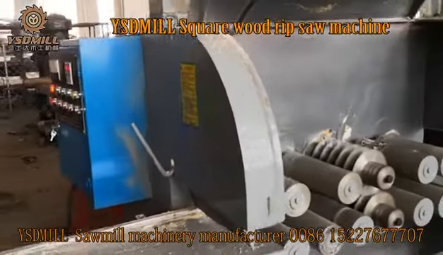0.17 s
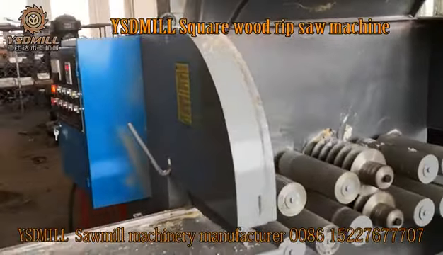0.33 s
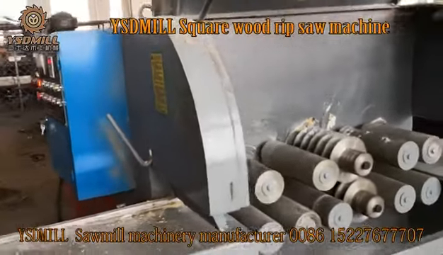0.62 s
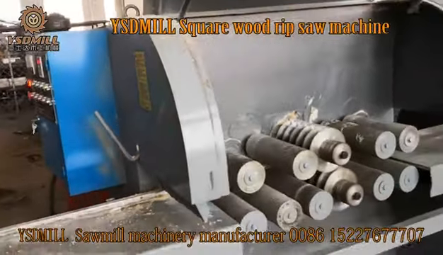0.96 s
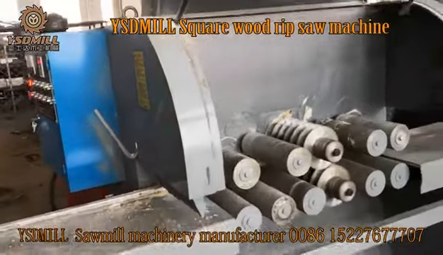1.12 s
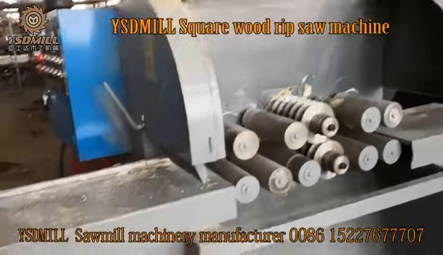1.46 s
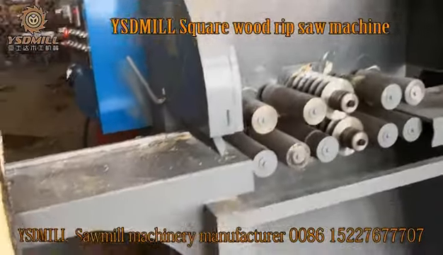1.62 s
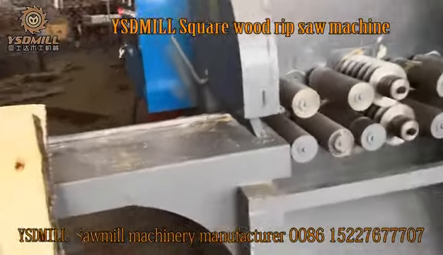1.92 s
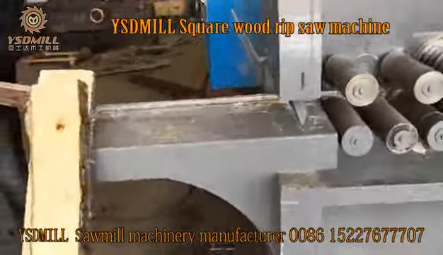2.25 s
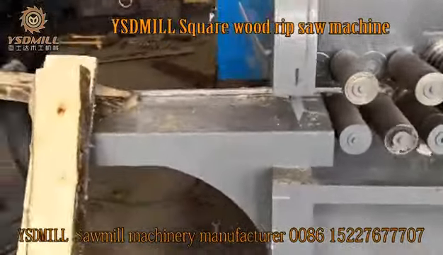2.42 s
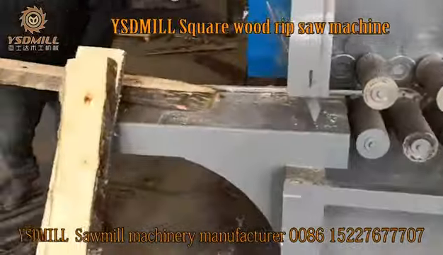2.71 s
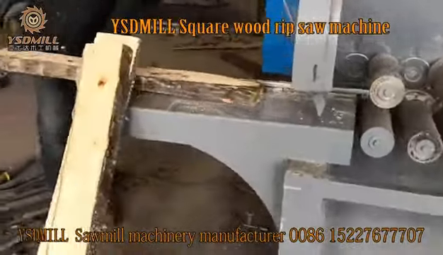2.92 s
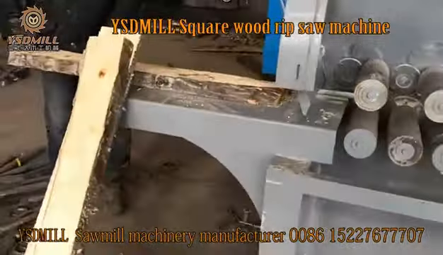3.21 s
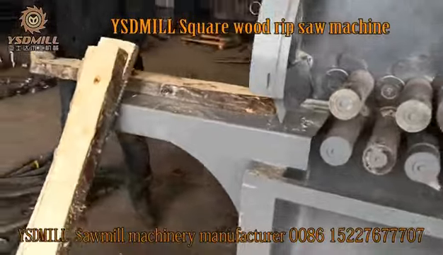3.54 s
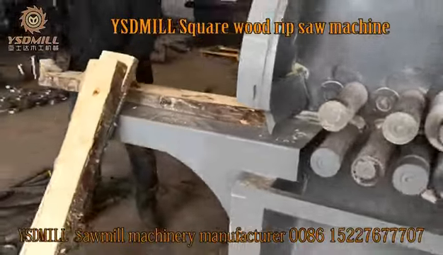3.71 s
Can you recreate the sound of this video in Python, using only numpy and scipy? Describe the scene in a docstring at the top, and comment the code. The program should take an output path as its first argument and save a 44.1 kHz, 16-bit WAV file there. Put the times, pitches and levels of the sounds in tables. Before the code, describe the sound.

Loud steady saw drone throughout, with hissing air stronger on the right and a fuzzy high squeal swelling and fading; one rapid double metallic clink on the left before the middle, in a noisy workshop hall.

```python
"""Idling multi-blade rip saw

In a workshop a saw idles past a moving pair of microphone ports. Shaped noise makes the hall wash, the
cabinet rumble and the rush of air through the blades on the right. Sines blurred by slow noise make the
wavering motor and gear whines and a fuzzy squeal with its octave. A steel tool, a set of decaying sines,
clinks twice, mostly on the left.
"""
import sys
import numpy as np
from scipy import signal
from scipy.io import wavfile
from scipy.ndimage import uniform_filter1d

SR = 44100
rng = np.random.default_rng(int(sys.argv[2]) if len(sys.argv) > 2 else 0)


def unload_audio(sound):
    """Save the sound as a 16-bit wav file, at the path given as the first command line argument."""
    columns = np.transpose(np.atleast_2d(sound))
    # keep every value between -1 and 1, then stretch to whole-number steps
    steps = np.round(np.clip(columns, -1, 1) * 32767)
    wavfile.write(sys.argv[1], SR, steps.astype(np.int16))


def voltage_ratio(decibels):
    """Convert decibels (scalar or array-like) to amplitude ratios, 20 dB per decade."""
    exponent = np.asarray(decibels, float) / 20
    return 10 ** exponent


N = 170667  # length [samples]


def evened(x):
    """Scales a signal to rms 1."""
    return x / np.sqrt(np.mean(np.abs(x) ** 2) + 1e-20)


def read(points, hz):
    """Reads a (frequency, value) table at hz, interpolating along log frequency."""
    f, value = np.transpose(points)
    return np.interp(np.log(hz + 1), np.log(f + 1), value)


def columns(table, t):
    """Reads every column of a curve table at times t; the first column is time."""
    rows = np.transpose(table)
    return [np.interp(t, rows[0], col) for col in rows[1:]]


def panned(pan_db):
    """Left and right gains whose levels differ by pan_db."""
    return voltage_ratio(np.array([[.5], [-.5]]) * pan_db)


def rfft_hz(size):
    """Bin frequencies of a short-time spectrum."""
    return np.arange(size // 2 + 1) * SR / size


def noise(field_db, patchy_db, flicker_db, channels=1, size=1024):
    """Random short-time spectra under field_db(hz, t), with patches and a flicker shared by all bins."""
    hop = size // 4
    frames, hz = N // hop + 5, rfft_hz(size)
    draws = rng.standard_normal((frames, len(hz), channels, 3))
    real, imag, patches = np.moveaxis(draws, (0, 1, 2, 3), (3, 2, 1, 0))
    patches = uniform_filter1d(patches, size=4, axis=1)  # across bins
    patches = evened(uniform_filter1d(patches, size=9, axis=2))  # across frames
    flicker = evened(uniform_filter1d(rng.standard_normal(frames), size=3))
    field = field_db(hz[:, None], np.arange(frames) * hop / SR)
    field = field + patchy_db * patches + flicker_db * flicker
    return (real + 1j * imag) * voltage_ratio(field)


def sound(spectra):
    """Turns short-time spectra into samples of rms 1."""
    size = 2 * (spectra.shape[-2] - 1)
    return evened(signal.istft(spectra, nperseg=size, noverlap=size * 3 // 4)[1][..., :N])


def tone(hz, width_hz, steady, lag, alike=.7):
    """A sine with a fuzzy skirt of slow noise, partly different at the two ports; rms about 1."""
    pole = np.exp(-np.pi * width_hz / SR)
    skirt = rng.standard_normal((N + SR, 2, 2)) @ np.array([1, 1j])
    skirt = signal.lfilter([1], [1, -2 * pole, pole * pole], skirt.T)
    skirt = evened(skirt[:, SR:])  # without the filter's run-in
    alike, steady = np.clip(alike, 0, 1), np.clip(steady, 0, 1)
    skirt[1] = alike * skirt[0] + np.sqrt(1 - alike ** 2) * skirt[1]
    phase = 2 * np.pi * (np.cumsum(hz * np.ones(N)) / SR + rng.random())
    carrier = np.exp(1j * (phase + np.array([[0], [lag]])))
    return np.sqrt(2) * (carrier * (np.sqrt(steady) + np.sqrt(1 - steady) * skirt)).real


def hall():
    """Diffuse wash of the hall: noise unrelated at the two ports, with a hollow under the squeal."""
    # relative spectrum of the wash (frequency [Hz], density [dB per Hz])
    wash_spectrum = [(150, -70.5), (270, -25), (390, -9), (550, -9.5), (1000, -8.5), (1300, -1),
                     (1520, -5.5), (1900, 0.5), (2600, 1), (3100, 4.5), (3330, -1), (3500, -16.5),
                     (3700, -7.5), (3870, -8.5), (4300, -13.5), (5500, -9.5), (6300, -12), (6800, -8),
                     (7050, -9), (7300, -7), (7600, -10)]
    # stereo balance of the wash (frequency [Hz], left minus right [dB])
    wash_pan = [(400, 1), (800, -2.5), (1500, 3.5), (3500, 0.5), (4500, 5), (6000, -0.5), (7100, 6.5),
                (7600, 2.5)]
    # relative motion of the wash (time [s], lows [dB], highs [dB], left minus right [dB], hollow [dB])
    wash_motion = [(0, 2, -3, -2.5, 0), (.7, 2, -2.5, -2, -2), (1.5, 1, -1.5, 2, -3.5),
                   (2.1, 1.5, -1.5, -0.5, -3), (2.6, 0.5, -3.5, -0.5, -8), (3.2, 2, -1.5, -0.5, -10.5),
                   (3.87, 1, -2, 0.5, -9.5)]
    level_db, hollow_hz, hollow_width_hz = -22.5, 2980, 215

    def field(hz, s):
        low, high, pan, hollow = columns(wash_motion, s)
        share = np.clip((hz - 3500) / 1000, 0, 1)  # lows hand over to highs from 3.5 to 4.5 kHz
        side = np.array([.5, -.5])[:, None, None] * (read(wash_pan, hz) + pan)
        dip = hollow * np.exp(-((hz - hollow_hz) / hollow_width_hz) ** 2)
        return read(wash_spectrum, hz) + (1 - share) * low + share * high + side + dip

    return voltage_ratio(level_db) * sound(noise(field, patchy_db=2.5, flicker_db=1.34, channels=2))


def cabinet(t):
    """Rumble of the cabinet, hums of the motor and the swelling boom of a panel, alike in both ports."""
    # relative spectrum of the rumble (frequency [Hz], density [dB per Hz])
    rumble_spectrum = [(12, -60), (20, -30), (38, -16.5), (81, -1), (136, -2.5), (166, -3.5), (194, -3),
                       (247, -4.5), (301, -10), (349, -8.5), (378, -21), (480, -26), (620, -60),
                       (1060, -120)]
    # hums of the motor (frequency [Hz], level [dB], width [Hz], steady share [0-1])
    motor_hums = [(90.1, -39, 21, 0), (197.3, -39.5, 15, 0.1), (251, -39, 7.6, 0)]
    # boom of a panel (time [s], frequency [Hz], level [dB])
    panel_boom = [(0, 128.2, -26.5), (.2, 131.1, -36), (.45, 127.5, -32.5), (1.1, 134.8, -40.5),
                  (1.6, 132.1, -42), (2.3, 131.2, -40), (2.47, 132, -26.5), (2.72, 127.6, -19.5),
                  (2.82, 132.7, -38.5), (3.05, 131.6, -24.5), (3.35, 130.5, -30), (3.5, 134, -27.5),
                  (3.87, 133, -33)]
    rumble_db, boom_width_hz = -27.5, 9.3

    def field(hz, s):
        return read(rumble_spectrum, hz) + 0 * s

    rumble = voltage_ratio(rumble_db) * sound(noise(field, patchy_db=1.5, flicker_db=1.26, size=4096))
    hums = sum(voltage_ratio(db) * tone(hz, width_hz, steady, 0)[0] for hz, db, width_hz, steady in motor_hums)
    boom_hz, boom_db = columns(panel_boom, t)
    boom = voltage_ratio(boom_db) * tone(boom_hz, boom_width_hz, 0.39, 0)[0]
    return rumble + hums + boom


def tool(t):
    """Each blow rings the same steel modes, struck at another spot; then the tool comes to rest."""
    # blows (time [s], level [dB])
    blows = [(1.5122, -9.5), (1.552, -17.5)]
    # modes of the steel, blow levels relative to the blow's own
    # (frequency [Hz], first blow [dB], second blow [dB], 60 dB decay [s], left minus right [dB])
    steel_modes = [(1194, -18.5, -20, 0.18, -5), (1836, -11, -8, 0.12, 5), (1920, -8, 1, 0.12, -2.5),
                   (2526, -17, 1, 0.12, -5.5), (2686, 0.5, -4.5, 0.11, 3), (3597, -6.5, -19.5, 0.13, 6),
                   (4670, -20.5, -10, 0.093, 8), (5200, -19, -41, 0.071, 12), (5630, -14.5, -19, 0.2, 9),
                   (5886, 2, -8, 0.3, 23), (5973, -6, 2.5, 0.38, 24), (6190, -35, -13.5, .12, 13),
                   (7200, -41, -3, .45, 18.5)]
    rise_s, damped_s, damped_t60_s = 0.0033, 1.655, .1
    out = np.zeros((2, N))
    for blow, (start, db) in enumerate(blows):
        since = np.maximum(t - start, 0)
        rise = 1 - np.exp(-since / rise_s)
        for mode, (hz, *spot_db, t60, pan) in enumerate(steel_modes):
            decay = voltage_ratio(db + spot_db[blow] - 60 * since / t60)
            ring = rise * decay * np.sin(2 * np.pi * hz * since)
            polarity = (-1) ** mode
            out += polarity * voltage_ratio(np.array([[0], [-pan]])) * ring  # pan acts on the right alone
    rest = voltage_ratio(-60 * np.maximum(t - damped_s, 0) / damped_t60_s)  # added damping
    return out * rest


def squeal(t):
    """A fuzzy whistle and its octave: drifting sines blurred by wide skirts of noise."""
    # whistle (time [s], pitch [Hz], level [dB], left minus right [dB], octave level [dB])
    whistle_curve = [(0, 3540, -38, -14.5, -49), (0.35, 3490, -28, -10.5, -37.5),
                     (0.83, 3503, -37, -5, -49.5), (1.6, 3545, -30.5, -2, -42.5),
                     (1.71, 3525, -26, -6, -41), (1.8, 3540, -48, -5, -59), (2.25, 3529, -31.5, -6.5, -43),
                     (2.45, 3554, -29, -3, -38.5), (2.72, 3524, -25.5, -7, -38.5),
                     (2.81, 3516, -28.5, -6, -34.5), (3.1, 3540, -28.5, 1.5, -38.5),
                     (3.45, 3528, -35, -6, -42), (3.87, 3510, -34.5, -2.5, -50)]
    width_hz, octave_width_hz, octave_pan_db = 99, 120, 7
    hz, db, pan, octave_db = columns(whistle_curve, t)
    whistle = voltage_ratio(db) * panned(pan) * tone(hz, width_hz, 0.068, 1.5, alike=0.32)
    octave = tone(2 * hz, octave_width_hz, 0.14, 0, alike=0.37)
    return whistle + voltage_ratio(octave_db) * panned(octave_pan_db) * octave


def whines(t):
    """Narrow wavering lines of motor and gears; some swell as the ports move through standing waves."""
    # lines of even level
    # (frequency [Hz], level [dB], width [Hz], steady share [0-1], left minus right [dB], port lag [rad])
    even_lines = [(632, -43, 25, .2, -1, 2.8), (1902, -38.5, 22, 0.3, 1.5, 6)]
    # swelling lines: (frequency [Hz], width [Hz], steady share [0-1], port lag [rad]),
    # each with its curve (time [s], level [dB], left minus right [dB])
    swelling_lines = [((830, 17, 0.17, 1.45), [(0, -55.5, -3), (.95, -44.5, -3), (1.85, -46, -5),
                      (2.05, -37.5, -3), (2.6, -44, -1), (2.9, -46, -4.5), (3.87, -49.5, -8)]),
                      ((1297, 14, 0.51, 0.16), [(0, -42.5, -1), (0.7, -42, -6.5), (1.4, -38, -5.5),
                      (1.7, -45, -1.5), (2.6, -46, -1.5), (3.4, -52, -6.5), (3.75, -38, -4),
                      (3.87, -36, 4)]), ((1397, 4.3, 0.64, 0.21), [(0, -38, -6), (0.18, -40, 2),
                      (0.42, -28, -3), (0.56, -43.5, 5), (0.8, -34, -5), (1.08, -42, -6), (1.3, -35, 4),
                      (1.52, -51.5, -13), (1.73, -30, -4), (2.0, -43, 12), (2.4, -43, 9),
                      (2.8, -35.5, -1.5), (3.3, -44.5, 8), (3.6, -32.5, 7), (3.87, -42, 10)]),
                      ((1660, 12, 0.17, 2.1), [(0, -33, -4), (.4, -38, -7), (.9, -41, -2), (1.5, -41.5, -4),
                      (2.1, -28.5, -3), (2.3, -45, -3), (2.6, -32, 1), (3.15, -29.5, -0.5), (3.4, -53, -4),
                      (3.87, -45.5, -1.5)]), ((2461, 75, 0.11, 2.5), [(0, -31, -5.5), (.6, -22, -7),
                      (1.1, -28.5, -11.5), (1.7, -24.5, -11.5), (2., -30, -10.5), (3., -27, -14),
                      (3.87, -27, -9.5)])]
    out = np.zeros((2, N))
    for hz, db, width_hz, steady, pan, lag in even_lines:
        out = out + voltage_ratio(db) * panned(pan) * tone(hz, width_hz, steady, lag, alike=0.5)
    for line, curve in swelling_lines:
        db, pan = columns(curve, t)
        out = out + voltage_ratio(db) * panned(pan) * tone(*line, alike=0.83)
    return out


def blades(t):
    """Air torn by the teeth: a broad drifting resonance on the right, weak and out of step on the left."""
    # rush (time [s], centre [Hz], right level [dB], left relative to right [dB], left port lag [rad])
    rush_curve = [(0, 2640, -19, -9, 2.4), (.5, 2580, -17, -19, 2.25), (1., 2590, -16, -16, 1.1),
                  (1.5, 2510, -16.5, -15, 1.1), (1.9, 2554, -18.5, -19.5, 4),
                  (2.25, 2597, -16.5, -11.5, 2.9), (2.6, 2470, -17.5, -6.5, 3.1), (3., 2280, -18, -8, 2.6),
                  (3.4, 2420, -17, -6.5, 3.1), (3.87, 2440, -17.5, -7.5, 2.9)]
    width_hz, top_hz = 795, 3650  # right: resonance and the steep roll-off above it
    leak_hz, leak_width_hz = 2970, 1120  # left: fixed band
    air = noise(lambda hz, s: 0 * hz * s, patchy_db=2.5, flicker_db=1.2)[0]
    hz = rfft_hz(1024)[:, None]
    frame_s = np.arange(air.shape[1]) * 256 / SR
    centre_hz, _, _, lag = columns(rush_curve, frame_s)
    resonance = air / (1 + ((hz - centre_hz) / (width_hz / 2)) ** 2)
    right = resonance / (1 + (hz / top_hz) ** 10)
    left = air / (1 + ((hz - leak_hz) / (leak_width_hz / 2)) ** 4) * np.exp(-1j * lag)
    _, db, leak_db, _ = columns(rush_curve, t)
    return voltage_ratio(db) * np.array([voltage_ratio(leak_db) * sound(left), sound(right)])


def scene():
    """Sums every layer at the two ports."""
    t = np.arange(N) / SR
    return hall() + cabinet(t) + tool(t) + squeal(t) + whines(t) + blades(t)


def low_pass(x):
    """Removes everything above the highest recorded frequency."""
    return signal.sosfilt(signal.butter(12, 7600, fs=SR, output="sos"), x)


def record(dry):
    """Cuts the treble with a steep linear-phase low-pass, then clips hard at full scale."""
    edge_hz, clip = 7610, 1.0
    edge = signal.firwin(4095, edge_hz, window=("kaiser", 11), fs=SR)
    band_limited = signal.oaconvolve(dry, edge[None], "same")
    clipped = np.clip(band_limited, -clip, clip)
    return low_pass(clipped)


dry = scene()
out = record(dry)
unload_audio(out)
```